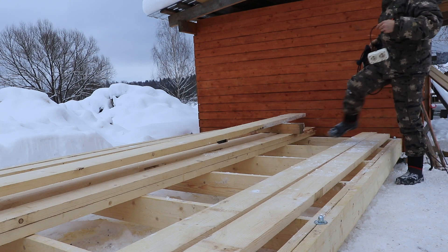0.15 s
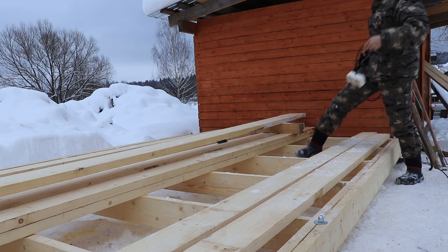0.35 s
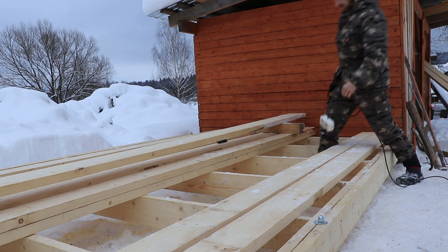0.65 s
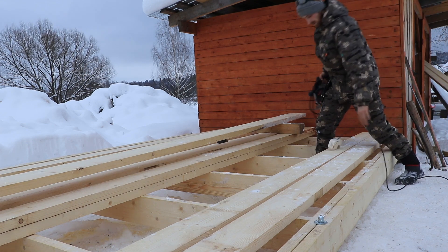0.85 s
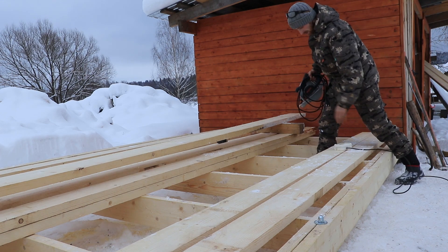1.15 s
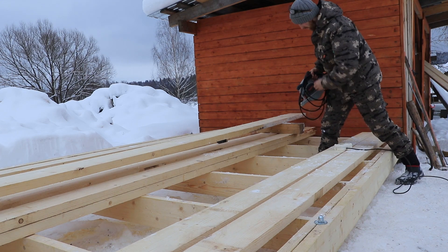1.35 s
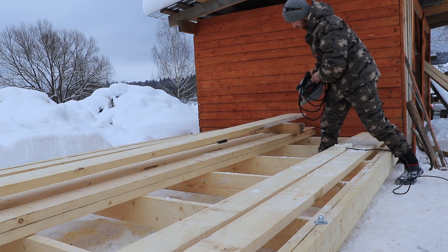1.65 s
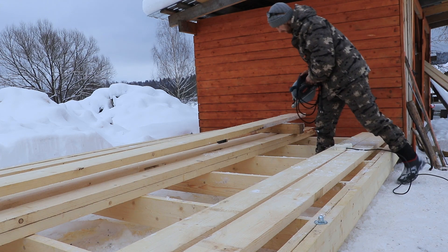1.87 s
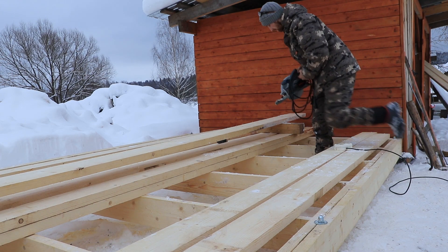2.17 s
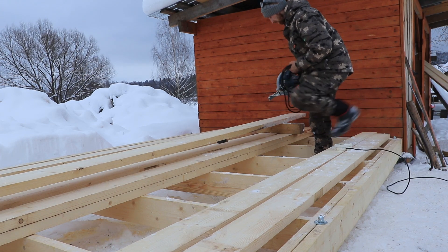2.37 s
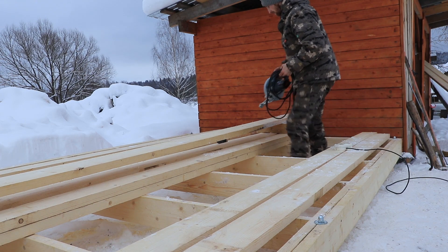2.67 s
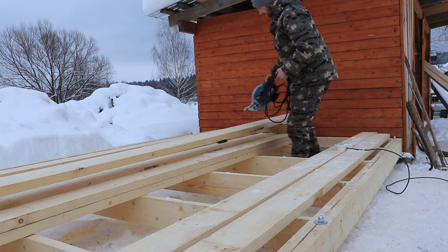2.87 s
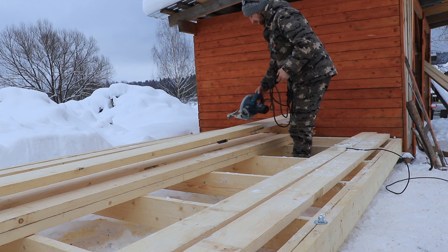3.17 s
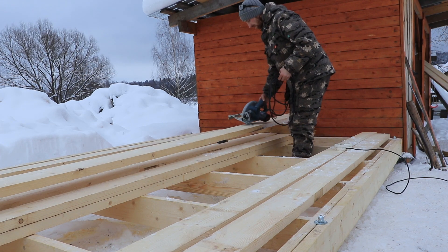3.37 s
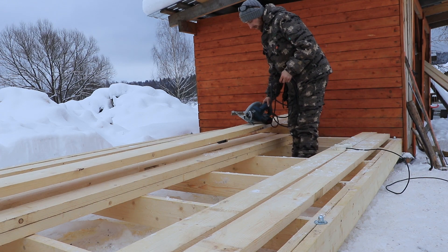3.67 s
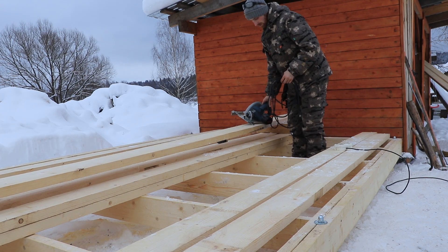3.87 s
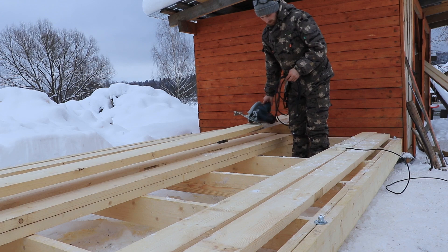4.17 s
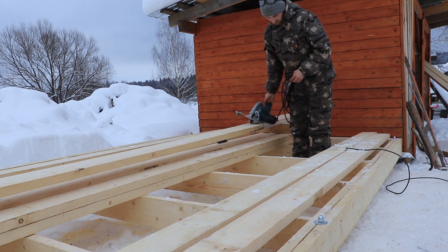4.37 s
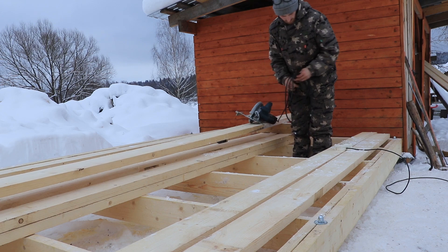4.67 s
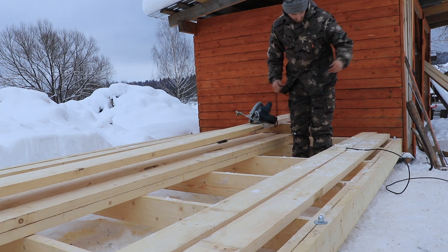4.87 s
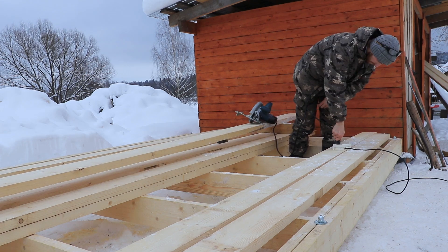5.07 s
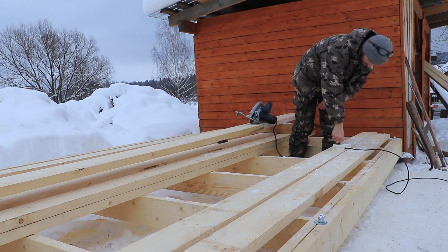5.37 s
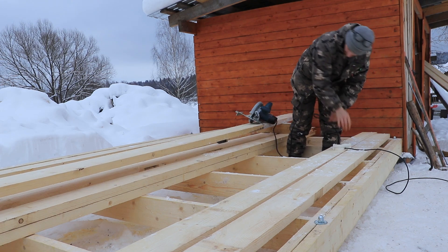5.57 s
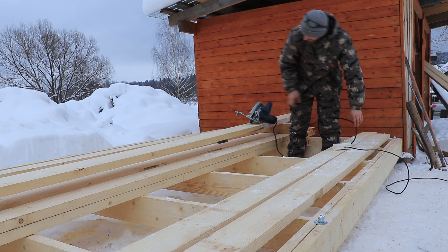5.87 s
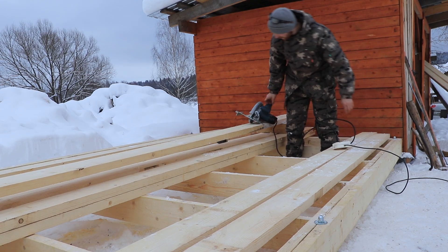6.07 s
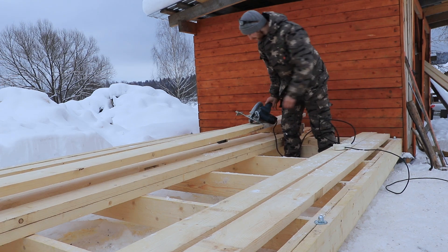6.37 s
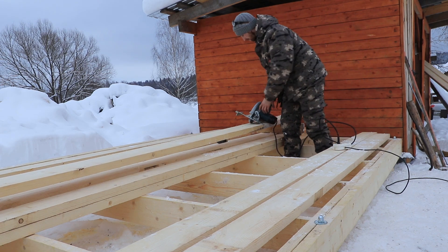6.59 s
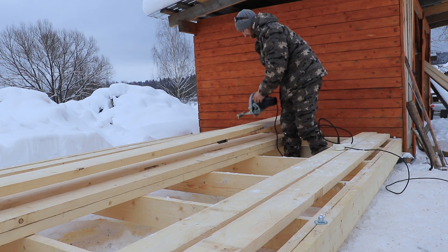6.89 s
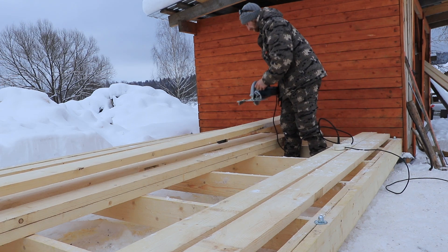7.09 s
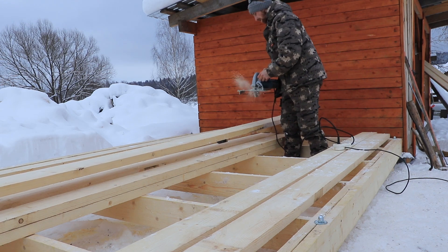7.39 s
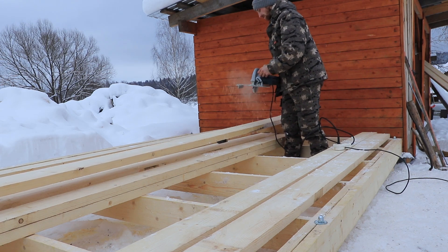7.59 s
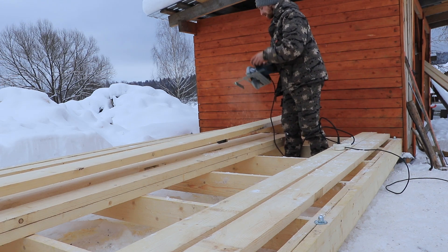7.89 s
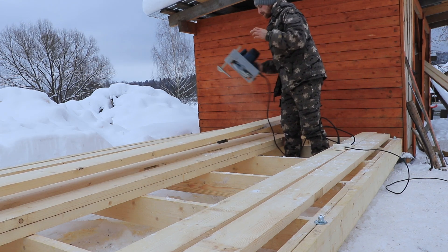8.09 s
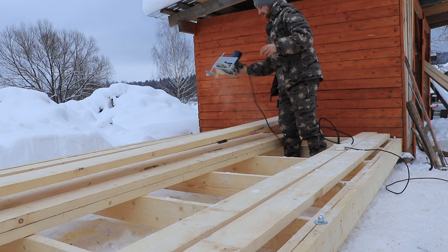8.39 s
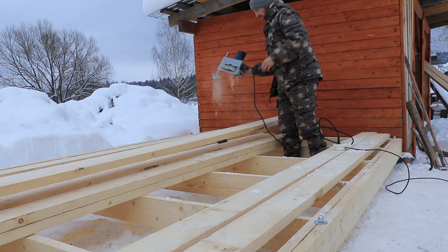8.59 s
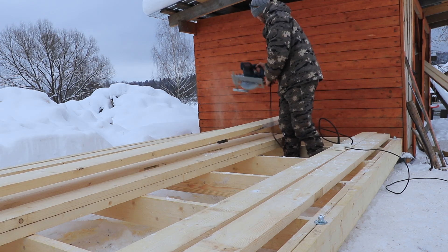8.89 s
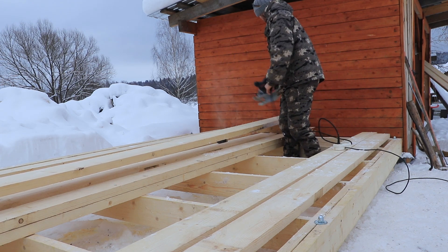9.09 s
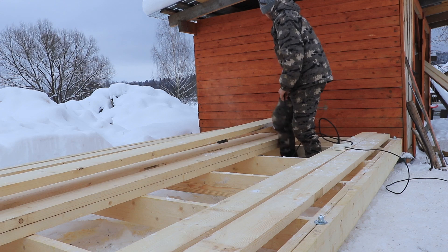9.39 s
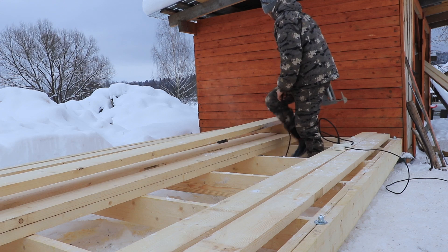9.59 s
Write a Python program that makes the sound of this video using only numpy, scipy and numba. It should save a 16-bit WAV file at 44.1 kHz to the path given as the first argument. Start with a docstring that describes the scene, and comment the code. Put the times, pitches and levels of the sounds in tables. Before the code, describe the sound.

Outdoors on a timber frame, boots thud and a plank knocks loudly, a saw lands on boards, then it roars briefly and whines down chattering.

```python
"""Timber frame and circular saw

Boots thud on joists, a plank is knocked down, and a saw lands on a stack of boards: struck wood and metal
are ringing modes, contact cracks and dense tails. Shaped noise makes the scrape, cloth, rumble, air and gusts;
gliding sines make a far bird. Last, the saw is blipped in free air: it kicks, roars and whines down, one speed
driving its motor and gears, which chatter once per blade turn."""
import sys
import numpy as np
from scipy import signal
from scipy.fft import rfft, irfft
from scipy.io import wavfile
from scipy.ndimage import uniform_filter1d
from numba import njit

SR = 44100
rng = np.random.default_rng(int(sys.argv[2]) if len(sys.argv) > 2 else 0)


def output_pcm(signal):
    """Save a mono or channel-first signal as 16-bit PCM at the path in sys.argv[1].

    Samples are clipped to [-1, 1] before scaling.
    """
    pcm = np.clip(np.atleast_2d(signal).T, -1, 1) * 32767
    wavfile.write(sys.argv[1], SR, np.round(pcm).astype(np.int16))


N = 429534
TIME = np.arange(N) / SR

# Blows on a loose plank, and at 5.287 s a brief ringing creak of the wood, levels ahead of the layer gain: #
# (time [s], level [dB], brightness [dB/octave], lingering ring [dB], favoured pitch [Hz])
PLANK_KNOCKS = [(0.639, -22.5, 0, -5.5, 850), (0.9465, 10.5, -1.5, -9.5, 607), (0.95, 11.5, 1, -19, 402),
                (0.961, 8, 5, -18, 440), (1.0655, 0, -5.5, -12.5, 534), (1.071, -7.5, 6, -10, 493),
                (1.179, -28, 2, -1, 450), (5.287, -19.5, 0, 6.5, 692), (5.292, -35.5, 8.5, -2, 740),
                (5.317, -22, -10, -13, 774), (5.463, -30.5, -2.5, 0, 603), (5.824, -22, -8, -8.5, 480),
                (5.955, -8, -1.5, -14, 920)]
# The saw landing and rocking on the stack, levels ahead of the layer gain:
# (time [s], level [dB], brightness [dB/octave], lingering ring [dB], favoured pitch [Hz])
STACK_LANDINGS = [(3.396, -12.5, -2.5, 2, 851), (3.402, 2.5, -1.5, -12, 1080), (3.421, -9, -2.5, -11, 425),
                  (3.446, -17.5, 0, 3, 283), (3.52, -22, 4, -4, 1200), (3.579, -21.5, 3, -2, 910),
                  (3.625, -23, -0.5, 7, 450), (3.976, -26, 3.5, -3, 393), (4.137, -23.5, -0.5, 3, 538),
                  (4.201, -16.5, 1.5, -16, 700), (4.217, -22, -1.5, -10, 681), (4.263, -21, -0.5, 1.5, 520),
                  (4.281, -18.5, -4, -6, 380)]
# Boots against the joists, levels ahead of the layer gain:
# (time [s], level [dB], brightness [dB/octave], lingering ring [dB], favoured pitch [Hz])
BOOT_STEPS = [(0.253, -34, 5, -10, 247), (0.405, -29, 3, -22, 168), (0.527, -32.5, 4, -35.5, 131),
              (0.684, -21, 0, -4.5, 230), (1.618, -31.5, 4.5, -21, 153), (2.748, -21, 1.5, -7, 206),
              (2.761, -24.5, 3, -1.5, 193), (3.784, -30, -3.5, 8, 396), (4.998, -33.5, 3.5, 0, 222),
              (5.161, -30.5, 5, -6.5, 684), (5.62, -30, 2, -27, 220), (6.302, -29.5, 5.5, -2, 160),
              (6.92, -41, -1, -20, 170), (7.054, -32, 2.5, -0.5, 152), (9.065, -26, 7, -7, 174),
              (9.141, -41, 12, 2, 1280), (9.2, -34, 3.5, 7, 168), (9.378, -36, -8, -12, 165)]
# The saw's guard, shoe and plug clacking, levels ahead of the layer gain:
# (time [s], level [dB], brightness [dB/octave], lingering ring [dB], favoured pitch [Hz])
GUARD_CLACKS = [(0.837, -32, 13, -10, 2800), (0.841, -20.5, 1.5, -2, 2300), (1.567, -35.5, -1, 1, 2920),
                (2.291, -35.5, -6, 6, 1330), (2.328, -24.5, -0.5, -7, 1190), (2.361, -19.5, 2.5, -6, 1240),
                (2.423, -28, 3, -19, 1350), (2.426, -22, 0, -7, 1220), (2.6, -27, 3.5, -11, 2150),
                (2.76, -26.5, 2, -11, 2180), (3.578, -24.5, 1, -47, 940), (4.202, -39, -1, 1.5, 1120),
                (4.738, -36.5, 1, -12.5, 1000), (4.885, -39, 0.5, -17, 918), (5.23, -34.5, 0.5, 2.5, 1180),
                (5.251, -36, -15, 5, 1500), (5.318, -17.5, -1, -9.5, 800), (5.55, -27.5, 3, -4, 920),
                (5.955, -19, -9.5, -6, 1500), (6.083, -29.5, 4.5, -24, 1610),
                (6.155, -35.5, 2.5, -6.5, 2500), (6.922, -30, -6, -17, 810), (9.646, -27.5, 3, 0.5, 1410)]
# Gear backlash slamming shut as the motor starts and lets go, levels ahead of the layer gain:
# (time [s], level [dB], brightness [dB/octave], lingering ring [dB], favoured pitch [Hz])
GEAR_KICKS = [(7.359, -28, -3, -1, 1150), (7.371, -1.5, -2.5, -13, 1020), (7.597, -6, -2.5, -1, 620),
              (7.986, -9, -1, -3, 1680)]
# The resting blade bumped as the saw is carried and lifted, levels ahead of the layer gain:
# (time [s], level [dB], brightness [dB/octave], lingering ring [dB], favoured pitch [Hz])
BLADE_TAPS = [(2.425, -29, -3, -20, 2100), (6.826, -28, -9.5, -17, 1640)]

# Resonances of the plank: (frequency [Hz], width before damping [Hz], level [dB])
PLANK_RESONANCES = [(195.6, 3.5, -2.5), (290.3, 3.9, -1.5), (370, 240, -8), (455, 75.5, 4), (587, 37, 3),
                    (726, 99, 1), (850, 400, -4), (914, 11.7, 0.5), (1255, 210, -23), (1250, 76, 2),
                    (1765, 107, -14), (1980, 180, -12.5), (2440, 840, -24), (2720, 51, -43),
                    (3120, 84, -19), (3990, 19, -45)]
# Resonances of the board stack: (frequency [Hz], width before damping [Hz], level [dB])
STACK_RESONANCES = [(98, 5.9, -11), (183, 8.8, -11), (279.6, 8.7, 5.5), (414.5, 8.7, 8.5), (470, 64, 5.5),
                    (628, 73, 5.5), (803, 39, 1), (1060, 51, 2.5), (1083, 52, 1), (1293, 18, 5.5),
                    (1470, 18, -11), (1690, 22, -2), (1820, 11, -2.5), (2270, 28, -2), (2500, 36, -18),
                    (2820, 19, -7), (3520, 18, -7.5)]
# Resonances of the joists: (frequency [Hz], width before damping [Hz], level [dB])
JOIST_RESONANCES = [(150, 17.3, 7.5), (205, 40, 0.5), (328, 160, -5.5), (522, 100, -9.5), (926, 71, -15.5)]
# Resonances of the saw's guard: (frequency [Hz], width before damping [Hz], level [dB])
GUARD_RESONANCES = [(860, 99, -4.5), (1256, 47, -2), (1690, 22, -10), (1874, 53, -6), (2096, 15, -8),
                    (2330, 260, -6.5), (2840, 16, -2.5), (3080, 31, -6), (3400, 22, -9), (4780, 88, -10),
                    (5270, 52, -6.5)]
# Resonances of the blade: (frequency [Hz], width before damping [Hz], level [dB])
BLADE_RESONANCES = [(603, 44, -6.5), (904, 12, -1.5), (1302, 47, -6), (1658, 14, 8), (2026, 15, 5),
                    (2925, 55, 4), (3637, 75, -0.5)]

# Colour of the plank's crack and dense upper modes: (frequency [Hz], gain [dB])
PLANK_COLOUR = [(59, -33), (100, -17.5), (169, -33), (204, -9.5), (310, -19.5), (472, -9), (570, -17.5),
                (674, -9.5), (1090, -16.5), (1260, -11.5), (2630, -23), (15000, -85)]
# Colour of the stack's crack and dense upper modes: (frequency [Hz], gain [dB])
STACK_COLOUR = [(35, -47), (60, -2.5), (277, -2), (310, -2), (408, -9.5), (549, -10.5), (1060, -1.5),
                (1460, -11), (3400, -17.5), (14000, -57.5)]
# Colour of the joists' crack and dense upper modes: (frequency [Hz], gain [dB])
JOIST_COLOUR = [(35, -27), (60, -1.5), (217, -0.5), (556, -9), (1150, -15), (1620, -21.5), (1880, -25),
                (2650, -23.5), (7410, -51), (10000, -54), (13000, -83), (22000, -120)]
# Colour of the crack and dense modes of guard and resting blade: (frequency [Hz], gain [dB])
GUARD_COLOUR = [(180, -40), (300, -4), (1060, 0), (1210, -8.5), (1440, -2.5), (2250, -7), (3550, -1),
                (6000, -19), (11500, -24.5), (15000, -55)]
# Colour of the shoe's scrape: (frequency [Hz], gain [dB])
SCRAPE_COLOUR = [(47, -38), (80, -17), (127, 2), (310, -7), (371, 2.5), (568, -6), (628, -5), (695, -4.5),
                 (904, -8.5), (1270, -9.5), (1380, -35), (1500, -8), (10000, -42), (13000, -71),
                 (22000, -120)]
# Colour of gear noise, gear kicks and cooling air: (frequency [Hz], gain [dB])
ROAR_COLOUR = [(88, -59), (150, -40), (290, -19.5), (332, -22), (595, -4.5), (930, -12.5), (1340, -3.5),
               (1480, -3.5), (2020, -6.5), (2410, -7.5), (2980, -8), (4930, -10), (6110, -19),
               (11400, -25.5), (15500, -35.5)]
# Colour of rubbing cloth: (frequency [Hz], gain [dB])
CLOTH_COLOUR = [(180, -60), (300, -12), (383, -12), (423, -12.5), (515, -0.5), (1730, -4), (4050, -11),
                (5180, -9.5), (7180, -26), (15000, -26.5)]
# Colour of the quiet outdoor air: (frequency [Hz], gain [dB])
AIR_COLOUR = [(15, -29), (28, 3), (156, -2), (684, 0), (1020, -4), (1240, -2.5), (1660, -8), (2700, -10.5),
              (3440, -9), (5140, -13.5), (6920, -17), (13500, -17.5), (15500, -19)]
# How well the housing radiates the whine: (frequency [Hz], gain [dB])
HOUSING_COLOUR = [(300, -26), (800, -14), (1300, 5), (2200, -8), (2700, -3), (4800, -3), (6200, -14),
                  (8300, -11), (9600, -2), (11600, -4), (15000, -19)]

# The shoe dragged over the boards, levels ahead of the layer gain:
# (time of peak [s], rise [s], fall [s], level [dB])
SHOE_DRAGS = [(3.48, 0.017, 0.038, -29), (3.62, 0.067, 0.049, -30.5), (3.95, 0.18, 0.06, -41),
              (4.27, 0.083, 0.073, -25.5)]
# Clothes and boots rubbing with each move, levels ahead of the layer gain:
# (time of peak [s], rise [s], fall [s], level [dB])
CLOTH_MOVES = [(0.82, 0.24, 0.3, -45.5), (1.98, 0.2, 0.07, -49.5), (2.5, 0.47, 0.36, -48),
               (2.535, 0.018, 0.045, -39.5), (4.26, 0.12, 0.083, -49), (4.92, 0.15, 0.23, -64),
               (5.26, 0.018, 0.089, -45), (5.55, 0.082, 0.07, -52), (5.94, 0.21, 0.29, -50),
               (6.82, 0.35, 0.15, -51), (9.08, 0.26, 0.14, -41), (9.46, 0.14, 0.26, -45),
               (9.67, 0.026, 0.042, -43)]
# The blade's howl during the spin-up: (time of peak [s], rise [s], fall [s], level [dB])
BLADE_HOWL = [(7.41, 0.035, 0.055, -17)]
# Gusts on the microphone: (time of peak [s], rise [s], fall [s], level [dB])
WIND_GUSTS = [(0.8, 0.8, 0.3, -55), (1.44, 0.12, 0.17, -50)]
# Whistles of a far bird: (start [s], length [s], pitch [Hz], droop at the end [Hz], level [dB])
BIRD_NOTES = [(4.062, 0.17, 7980, 250, -65), (4.33, 0.18, 7880, 620, -61)]

AIR_DB = -52.5
TOP_HZ = 15900  # upper limit of the sound
START_S, RELEASE_S, STOP_S = 7.348, 7.59, 9.3015  # trigger pressed, trigger let go, blade at rest
SPIN_UP_S = 0.035  # time constant
# coasting: time constant of drag, slot rate where drag equals dry friction, ceiling of the slot rate
COAST_S, FRICTION_HZ, TOP_SPEED_HZ = 1.1558, 1315, 4700
SLOTS, TEETH, VANES = 12, 7, 18  # armature slots, pinion teeth and fan vanes on the shaft
SLOTS_PER_TURN, TURN_S = 66.5, 8.364  # slots passing per blade turn; phase reference of the chatter
DRIVEN_DB = -3  # trim of the running saw until release
SURGE_DB, SURGE_S = 12.5, 0.11  # extra roar at the start, and its decay
CHATTER_DB, CHATTER_HZ = 6, 2260  # depth scale, and the slot rate below which chatter sets in
BLADE_DB = -6.5  # ring of the blade against the gear noise
RESONANCE_DB, RESONANCE_HZ, RESONANCE_OCTAVES = 14, 1658, 0.14  # extra ring around one slot rate
# whine: level, fall per octave of partial number above the second, trim of odd partials
WHINE_DB, WHINE_FALL_DB, WHINE_ODD_DB = -28.5, -9, -3
BURIED_DB, BURIED_HZ = -10, 3500  # how far the whine sinks above this slot rate
MESH_DB, SONG_DB, VANE_DB = -28, -13.5, -22.5  # tooth mesh, singing shaft harmonics, fan vanes


def undb(db):
    """Decibels to gain."""
    return 10 ** (np.asarray(db) / 20)


def unit(x):
    """Scale to rms 1."""
    return x / np.sqrt(np.mean(x ** 2) + 1e-20)


def crest(x, size=128):
    """Scale so that the loudest three milliseconds have rms 1."""
    return x / np.sqrt(uniform_filter1d(x ** 2, size).max())


def walk(rate):
    """Smooth random drift of rms 1, heading for a new value `rate` times a second."""
    hold = max(int(SR / rate), 1)
    steps = np.repeat(rng.standard_normal(N // hold + 1), hold)[:N]
    return unit(uniform_filter1d(steps, hold))


def grit(grain_db, rate):
    """Noise made of uneven grains."""
    return unit(rng.standard_normal(N) * undb(grain_db * walk(rate)))


def tint(x, points, tilt_db=0, size=4096):
    """Causal minimum-phase filter through (Hz, dB) points, tilted in dB per octave about 1 kHz."""
    hz, db = np.transpose(points)
    f = np.maximum(np.arange(size // 2 + 1) * SR / size, 10)
    gain_db = np.interp(np.log(f), np.log(hz), db)
    gain_db = gain_db + tilt_db * np.log2(np.maximum(f, 150) / 1000)
    # folding the cepstrum puts the energy first, so attacks stay sharp
    cepstrum = irfft(gain_db * np.log(10) / 20)[:size // 2]
    cepstrum[1:] *= 2
    impulse = irfft(np.exp(rfft(cepstrum, size)))[:size // 2]
    return signal.fftconvolve(x, impulse)[:len(x)]


def band(x, lo_hz, hi_hz, order=3):
    """Band-pass."""
    sos = signal.butter(order, [lo_hz, min(hi_hz, SR / 2 - 1)], "band", fs=SR, output="sos")
    return signal.sosfilt(sos, x)


def strokes(rows):
    """Gain of (peak s, rise s, fall s, dB) moves, each swelling to its peak and dying away."""
    gain = 0
    for s, rise_s, fall_s, db in rows:
        width_s = np.where(TIME < s, rise_s, fall_s)
        gain = gain + undb(db) * np.exp(-((TIME - s) / width_s) ** 2)
    return gain


def ring(modes, t, damping=1):
    """Free decay of (Hz, width, dB) modes; neighbours swing against each other, wider ones die sooner."""
    out = 0
    for k, (hz, width, db) in enumerate(modes):
        decay = np.exp(-np.pi * width * damping * t)
        out = out + (-1) ** k * undb(db) * width * decay * np.sin(2 * np.pi * hz * t)
    return out


def strikes(rows, modes, colour, damping, crack_db, crack_s, low_t60, mid_t60, high_t60, focus_db, gain_db):
    """Each blow rings the main modes, cracks at the contact, and spreads into dense modes band by band."""
    out, t = np.zeros(N + SR), np.arange(int(SR * .7)) / SR
    edges = np.geomspace(80, 16000, 11)
    # decay times in seconds, set at 200, 1000 and 7000 Hz
    anchors = np.log([low_t60, mid_t60, high_t60])
    t60s = np.exp(np.interp(np.log(edges), np.log([200, 1000, 7000]), anchors))
    body = crest(ring(modes, t, damping))
    for s, db, tilt_db, linger_db, centre_hz in rows:
        contact, spread = rng.standard_normal((2, len(t)))
        crack = crest(tint(contact * np.exp(-t / crack_s), colour))
        tail = 0
        for lo, hi, t60 in zip(edges, edges[1:], t60s):
            tail = tail + band(spread, lo, hi) * np.exp(-np.log(1000) * t / t60)
        # the dense modes take a moment to build up
        tail = crest(tint(tail * (1 - np.exp(-t / 0.0061)), colour))
        # the spot that is struck favours the modes around one frequency
        spot = [(centre_hz / 2, 0), (centre_hz, focus_db), (centre_hz * 2, 0)]
        blow = tint(body + undb(crack_db) * crack + undb(linger_db) * tail, spot, tilt_db)
        i = int(s * SR)
        out[i:i + len(t)] += undb(db + gain_db) * crest(blow)
    return out[:N]


def outdoor_air():
    """Quiet winter air: coloured noise whose level drifts slightly."""
    return undb(AIR_DB + .5 * walk(2.0)) * unit(tint(rng.standard_normal(N), AIR_COLOUR))


def frame_rumble():
    """The frame rumbles faintly: low band noise."""
    return unit(band(grit(grain_db=0.5, rate=27), 110, 250)) * undb(-60.5)


def wind_gusts():
    """Soft gusts on the microphone: very low noise that swells and dies."""
    return unit(band(grit(grain_db=4, rate=7), 14, 45)) * strokes(WIND_GUSTS)


def boot_steps():
    """Boots thud on the joists, which ring low."""
    return strikes(BOOT_STEPS, JOIST_RESONANCES, JOIST_COLOUR, damping=1.4, crack_db=1.0, crack_s=0.0033,
                   low_t60=0.18, mid_t60=0.22, high_t60=0.064, focus_db=9.0, gain_db=-5)


def cloth_rustle():
    """Clothes and boots rub: grainy noise under the swell of each move."""
    return undb(0.5) * unit(tint(grit(grain_db=3.0, rate=73), CLOTH_COLOUR)) * strokes(CLOTH_MOVES)


def plank_knocks():
    """The loose plank is knocked and rings in its bending modes."""
    plank = strikes(PLANK_KNOCKS, PLANK_RESONANCES, PLANK_COLOUR, damping=1.6, crack_db=1, crack_s=0.0047,
                    low_t60=0.37, mid_t60=0.085, high_t60=0.081, focus_db=9, gain_db=-3.0)
    return band(plank, 130, 16000, order=2)


def guard_clacks():
    """Guard, shoe and plug of the carried saw clack with short metallic rings."""
    return strikes(GUARD_CLACKS, GUARD_RESONANCES, GUARD_COLOUR, damping=0.84, crack_db=0.5, crack_s=0.0015,
                   low_t60=0.11, mid_t60=0.14, high_t60=0.058, focus_db=7.5, gain_db=-5.0)


def blade_taps():
    """The resting blade is bumped and rings in its own modes."""
    return strikes(BLADE_TAPS, BLADE_RESONANCES, GUARD_COLOUR, damping=1.0, crack_db=-7, crack_s=0.0016,
                   low_t60=0.15, mid_t60=0.17, high_t60=0.08, focus_db=13.5, gain_db=-4)


def stack_landings():
    """The saw lands and rocks on the stack, whose boards boom and ring."""
    return strikes(STACK_LANDINGS, STACK_RESONANCES, STACK_COLOUR, damping=1.37, crack_db=-0.5, crack_s=0.0064,
                   low_t60=0.44, mid_t60=0.15, high_t60=0.38, focus_db=6, gain_db=-10.5)


def shoe_scrape():
    """The shoe slips over the boards in grains that also excite the stack's modes."""
    slips = grit(grain_db=4, rate=220)
    boards = unit(signal.fftconvolve(slips, ring(STACK_RESONANCES, TIME[:SR // 3]))[:N])
    scrape = unit(tint(slips, SCRAPE_COLOUR)) + undb(-1.5) * boards
    return undb(-7.0) * scrape * strokes(SHOE_DRAGS)


def whistle(start_s, length_s, hz, droop_hz, db):
    """A thin sine note that swells, fades and droops at its end."""
    along = np.clip((TIME - start_s) / length_s, 0, 1)
    pitch_hz = hz - droop_hz * along ** 3 + 45 * walk(200)
    return undb(db) * np.sin(np.pi * along) * np.sin(2 * np.pi * np.cumsum(pitch_hz) / SR)


def far_bird():
    """A small bird whistles far off."""
    return sum(whistle(*row) for row in BIRD_NOTES)


def by_speed(slot_hz, knee_hz, power):
    """Gain that grows as a power of the speed and levels off at 1 above the knee."""
    return (1 + (knee_hz / np.maximum(slot_hz, 1)) ** 8) ** (-power / 8)


def motor_speed():
    """Slot rate in Hz: a leap towards the ceiling, then drag and dry friction bring the motor to rest."""
    spin_up = -np.expm1(-np.maximum(TIME - START_S, 0) / SPIN_UP_S)
    coast_hz = FRICTION_HZ * np.expm1(np.maximum(STOP_S - TIME, 0) / COAST_S)
    return spin_up * TOP_SPEED_HZ * by_speed(coast_hz, TOP_SPEED_HZ, 1)


def gear_kicks():
    """Gear backlash slams shut, cracking hard and ringing the blade."""
    return strikes(GEAR_KICKS, BLADE_RESONANCES, ROAR_COLOUR, damping=0.82, crack_db=8.5, crack_s=0.0019,
                   low_t60=0.28, mid_t60=0.22, high_t60=0.086, focus_db=3.0, gain_db=-5.0)


def gear_noise(shaft, force_hz, chatter):
    """Uneven tooth contacts shake the housing and ring the blade; the roar surges at the start."""
    teeth = grit(grain_db=2.3, rate=450) * (1 + .5 * np.cos(TEETH * shaft)) * chatter
    blade_ring = ring(BLADE_RESONANCES, TIME[:SR // 4], damping=0.83)
    blade = unit(signal.fftconvolve(teeth, blade_ring)[:N])
    octaves_off = np.log2(np.maximum(force_hz, 1) / RESONANCE_HZ)
    resonance = np.exp(-(octaves_off / RESONANCE_OCTAVES) ** 2)
    gears = unit(tint(teeth, ROAR_COLOUR)) + undb(BLADE_DB + RESONANCE_DB * resonance) * blade
    surge = undb(SURGE_DB * np.exp(-np.maximum(TIME - START_S, 0) / SURGE_S))
    roar = undb(-14.0) * surge * by_speed(force_hz, knee_hz=1850, power=1.55) * band(gears, 134, 1340)
    rasp = undb(-15.5) * by_speed(force_hz, knee_hz=2700, power=1.56) * band(gears, 2170, 6080)
    # a narrow blade band howls during the spin-up, then pings with the chatter, fading with the speed
    ping_gain = strokes(BLADE_HOWL) + undb(-27) * by_speed(force_hz, knee_hz=1000, power=1.08)
    ping = ping_gain * unit(band(teeth * chatter, 1243, 1315, order=2))
    return roar + rasp + ping


def gear_tones(shaft, force_hz):
    """Tooth mesh hums at middling speeds; shaft harmonics sing as they glide through a resonant band."""
    mesh = sum(np.sin(k * TEETH * shaft + .7 * walk(110)) for k in (1, 2, 3, 4))
    not_slow = by_speed(force_hz, knee_hz=1710, power=3.5)
    not_fast = 1 - by_speed(force_hz, knee_hz=2650, power=6)
    harmonics = sum(undb(db) * np.sin(k * shaft + .7 * walk(110)) for k, db in [(7, 0), (8, -2), (9, -4)])
    song = band(harmonics, 1250, 1440, order=2)
    return undb(MESH_DB) * not_slow * not_fast * mesh + undb(SONG_DB) * song


def slot_whine(phase, slot_hz, count=18):
    """Fluttering slot partials: higher ones fall off past the second, odd ones are weaker."""
    out = 0
    for k in range(1, count + 1):
        db = WHINE_DB + WHINE_FALL_DB * np.log2(max(k / 2, 1)) + WHINE_ODD_DB * (k % 2)
        audible = k * slot_hz < TOP_HZ
        out = out + undb(db + 2 * walk(22)) * np.sin(k * phase) * audible
    return out


def motor(shaft, slot_hz, force_hz):
    """Armature slots and fan vanes whine through the housing, over the hiss of the cooling air."""
    # the shaft wobbles on every turn, so the partials flutter and grow sidebands
    wobble = SLOTS * shaft + .14 * walk(160) + .11 * np.sin(shaft)
    vanes = undb(VANE_DB + 2 * walk(15)) * np.sin(VANES * shaft + .6 * walk(110))
    vanes = vanes * by_speed(force_hz, knee_hz=2800, power=3)
    whine = tint(slot_whine(wobble, slot_hz) + vanes, HOUSING_COLOUR)
    whine = whine * by_speed(force_hz, knee_hz=490, power=1.8)
    # near top speed the partials sink into the roar
    whine = whine * undb(BURIED_DB * by_speed(force_hz, BURIED_HZ, power=18))
    hiss = unit(band(tint(grit(grain_db=1.5, rate=150), ROAR_COLOUR), 6200, 16000))
    return whine + undb(-33.0) * by_speed(force_hz, knee_hz=2380, power=3.1) * hiss


def saw():
    """One speed drives motor and gears; as it drops, the slack gears chatter once per blade turn."""
    slot_hz = motor_speed()
    slots = np.cumsum(slot_hz) / SR
    shaft = 2 * np.pi * slots / SLOTS
    turns = (slots - slots[int(TURN_S * SR)]) / SLOTS_PER_TURN
    # under power the teeth are pressed together at full force; once let go, the force follows the speed
    driven = TIME < RELEASE_S
    force_hz = np.where(driven, TOP_SPEED_HZ, slot_hz)
    depth_db = CHATTER_DB * (1 - by_speed(force_hz, CHATTER_HZ, power=8.5))
    chatter = undb(depth_db * (np.cos(2 * np.pi * turns) + .2 * walk(25) - .45))
    running = gear_noise(shaft, force_hz, chatter)
    running = running + chatter * gear_tones(shaft, force_hz)
    running = running + motor(shaft, slot_hz, force_hz)
    switch_on = np.clip((TIME - START_S) / 0.011, 0, 1) * undb(DRIVEN_DB * driven)
    return switch_on * running + gear_kicks()


def scene():
    """Everything as it reaches one microphone."""
    outdoors = outdoor_air() + wind_gusts() + far_bird()
    timber = frame_rumble() + boot_steps() + plank_knocks() + stack_landings()
    handling = cloth_rustle() + guard_clacks() + blade_taps() + shoe_scrape()
    return (outdoors + timber + handling + saw())[None]


@njit
def follow_peaks(size, attack, release):
    """Envelope that rises fast and sinks slowly."""
    out, e = np.empty(len(size)), 0.
    for i in range(len(size)):
        e += (size[i] - e) * (attack if size[i] > e else release)
        out[i] = e
    return out


def record(dry, limit_db=-4, attack_s=0.0019, release_s=0.096):
    """A limiter ducks loud blows, peaks that outrun it clip, and the top is cut."""
    envelope = follow_peaks(np.abs(dry[0]), 1 / (attack_s * SR), 1 / (release_s * SR))
    held = np.clip(dry / np.maximum(envelope / undb(limit_db), 1), -1, 1)
    return signal.sosfilt(signal.ellip(8, .2, 70, TOP_HZ, fs=SR, output="sos"), held)


dry = scene()
out = record(dry)
output_pcm(out)
```